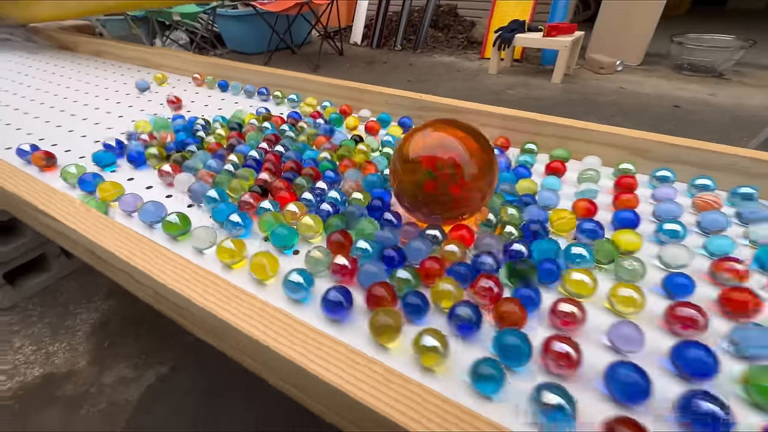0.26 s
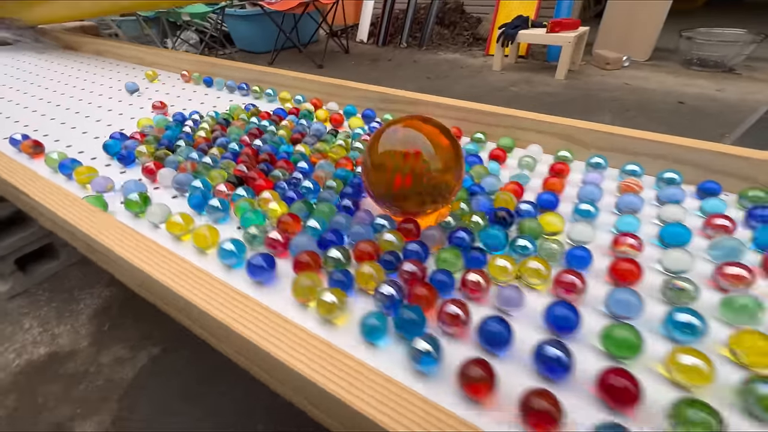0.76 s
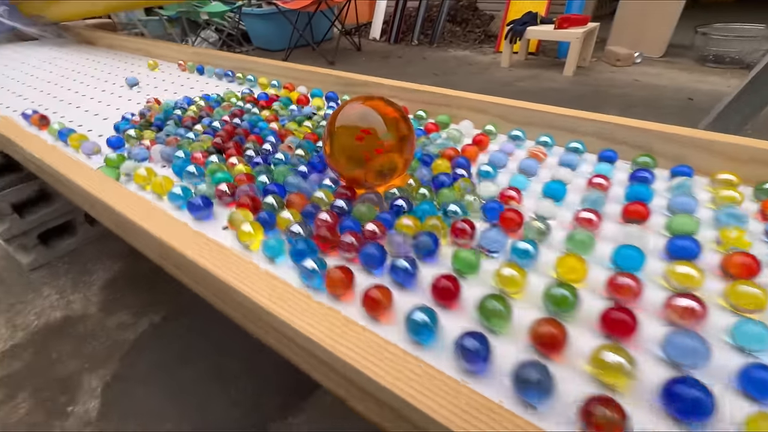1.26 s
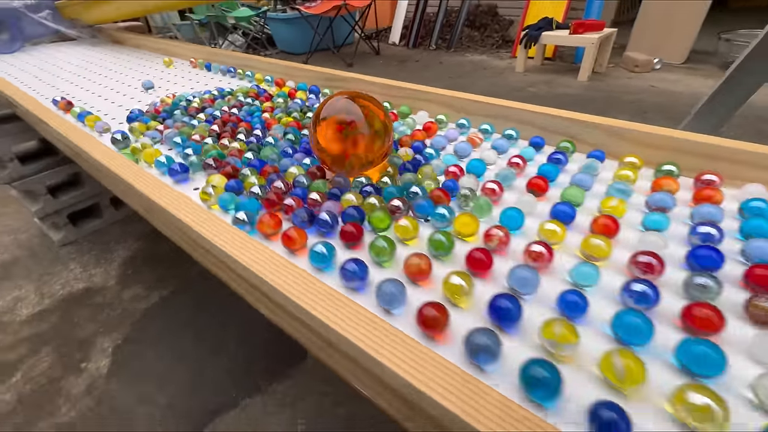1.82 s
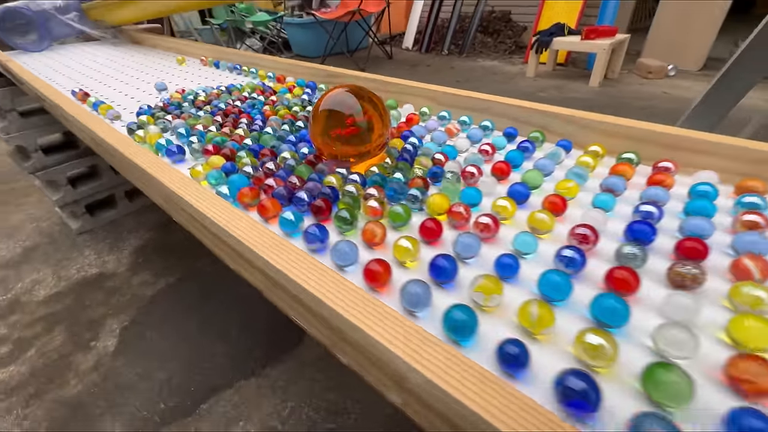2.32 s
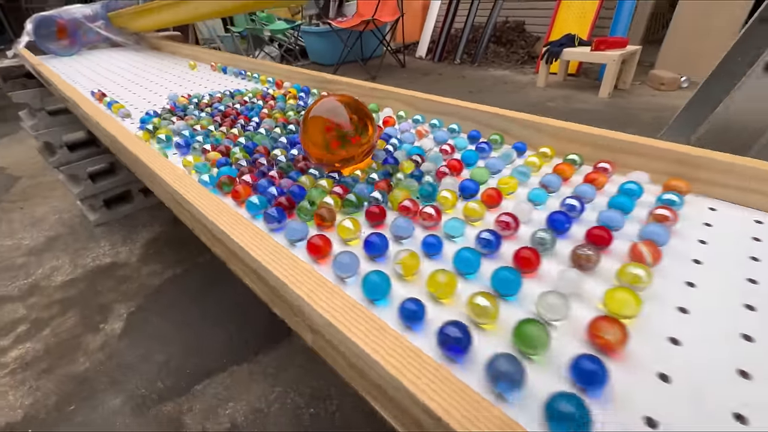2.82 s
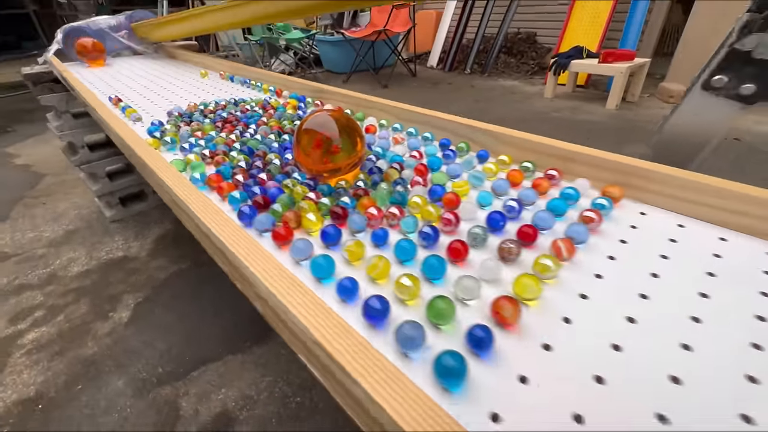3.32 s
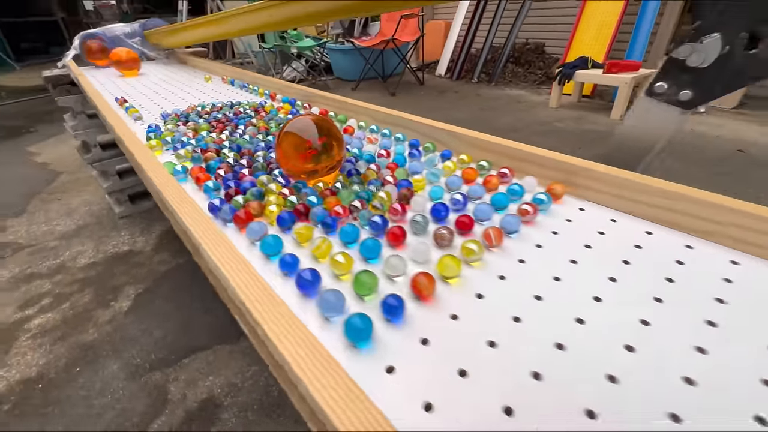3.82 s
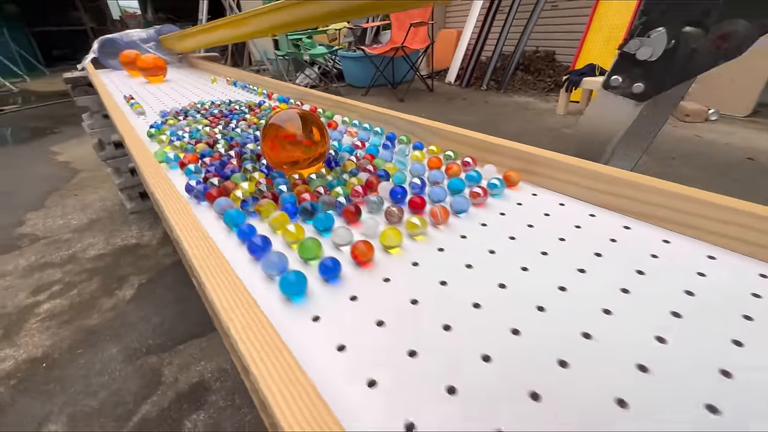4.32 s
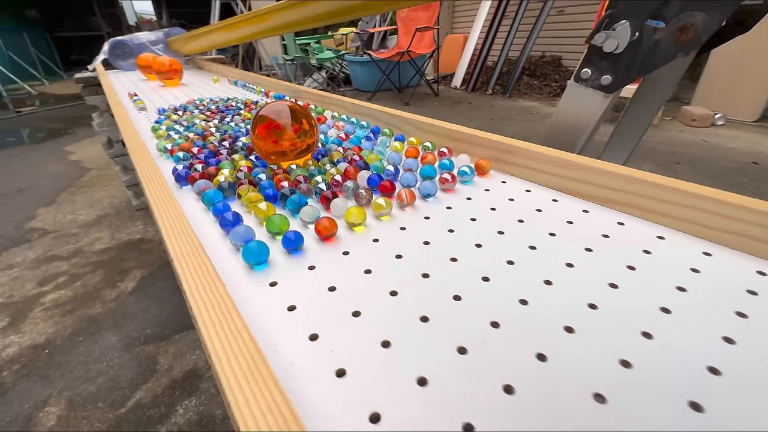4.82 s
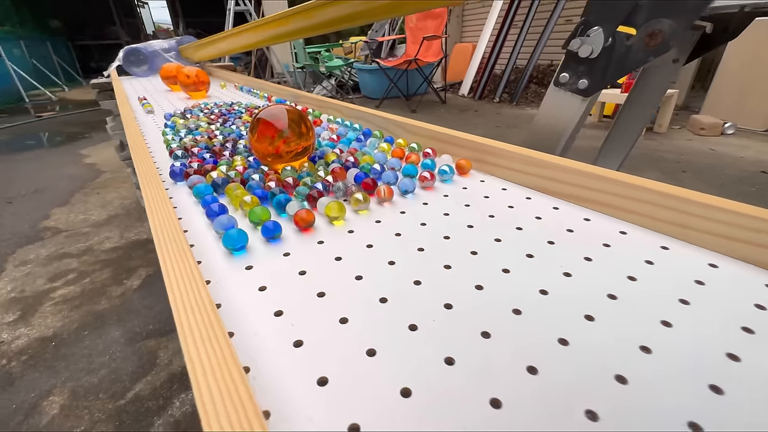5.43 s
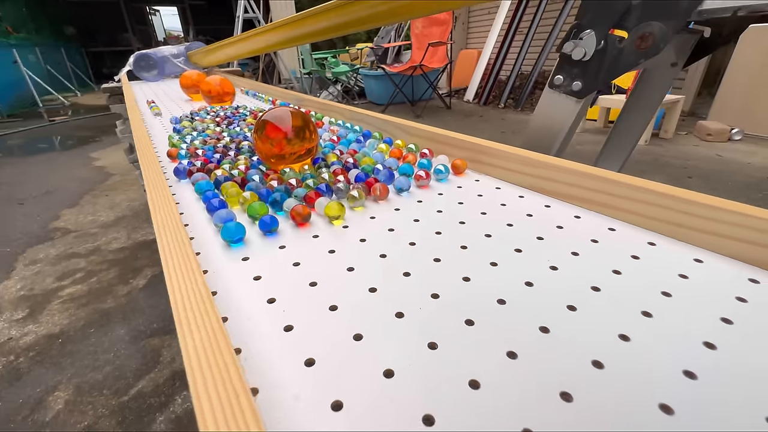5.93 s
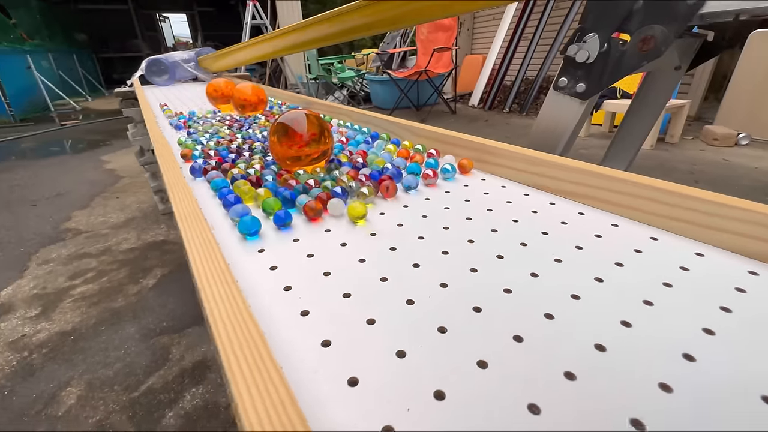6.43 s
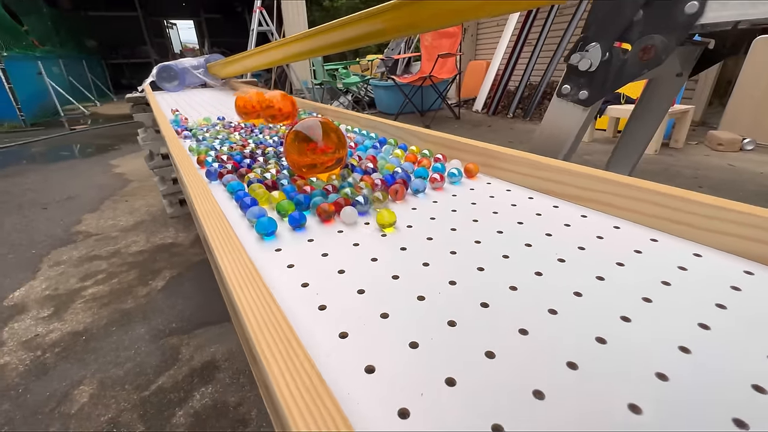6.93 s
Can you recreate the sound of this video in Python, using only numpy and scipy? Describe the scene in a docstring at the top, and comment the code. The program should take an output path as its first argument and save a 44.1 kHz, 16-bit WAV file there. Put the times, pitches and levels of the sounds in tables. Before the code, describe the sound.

Close stereo pickup of many small glass marbles jostling on a sloping wooden board in an open yard. Fine ticking and woody knocks run continuously; heavy marbles land with short solid thuds and rumbling rolls around the middle. The pack settles into quiet, separate clicks, then a loud, dense clatter of wood and glass bursts out and surges to the end. Dry, with slightly dulled treble and faint low rumble beneath.

```python
"""Hundreds of glass marbles jostle on a sloping wooden pegboard in a yard, heard close by in stereo.
They click on each other and knock on the board: short shaped noise bursts with brief rings.
Heavy marbles thump down as sagging notes with board modes, and roll in with a rumble of bumps.
The pack calms to single clicks, then a loud, dense clatter breaks out in surges and crashes.
Below lies filtered low noise; two unlike microphone ports pick everything up."""
import sys
import numpy as np
from scipy import signal
from scipy.fft import rfft, irfft, next_fast_len
from scipy.io import wavfile
from scipy.ndimage import uniform_filter1d

SR = 44100
rng = np.random.default_rng(int(sys.argv[2]) if len(sys.argv) > 2 else 0)


def master(y):
    """Save y as 16-bit WAV."""
    cut = np.clip(np.atleast_2d(y).T, -1, 1)
    pcm = np.round(cut * 32767)  # scale
    wavfile.write(sys.argv[1], SR, pcm.astype(np.int16))


N = 315756

# time and frequency axes of one contact sound
TAPS = 4096
T = np.arange(TAPS) / SR
HZ = np.fft.rfftfreq(TAPS, 1 / SR)

# colour of a heavy thud on the board: (frequency [Hz], relative density [dB per Hz])
THUD_COLOUR = [(40, -26), (110, -14.5), (220, -8), (390, -2), (480, -7), (800, -29), (2000, -63)]
# colour of a small knock on the board: (frequency [Hz], relative density [dB per Hz])
KNOCK_COLOUR = [(100, -30.5), (300, -14), (480, -5.5), (600, -0.5), (690, 1.5), (850, -3.5), (1100, -9),
                (1700, -27.5), (3500, -39)]
# colour of a light click of glass: (frequency [Hz], relative density [dB per Hz])
CLICK_COLOUR = [(500, -8), (1200, -11), (1800, -3), (2400, -2), (3350, 1.5), (4000, -7), (4600, -12),
                (5500, -16), (6500, -24), (7500, -42.5)]
# colour of a crisp snap of glass: (frequency [Hz], relative density [dB per Hz])
SNAP_COLOUR = [(500, -17.5), (1100, -5), (1700, -3), (2200, 2), (3400, 0), (4100, -3), (5000, -13.5),
               (6300, -20), (7500, -19)]
# a heavy marble comes down: (time [s], thud [dB], thud pitch [Hz], board ring [dB], glass click [dB]);
# the levels are relative
HEAVY_LANDINGS = [(0.4893, -20.5, 473, -25, -34.5), (0.715, -22.5, 310, -29, -34.5),
                  (1.038, -25, 665, -31, -35), (2.4311, -12, 390, -14, -25),
                  (2.486, -12.5, 407, -13, -15.5), (2.7456, -22.5, 720, -24, -28.5),
                  (2.847, -20.5, 278, -15, -17), (3.184, -10, 379, -17, -24.5),
                  (3.24, -11.5, 390, -15.5, -15), (3.502, -22, 613, -23, -26.5),
                  (3.5998, -19.5, 265, -18, -18)]

KNOCK_HZ, KNOCK_OCTAVES = 638, 0.15  # centre pitch of a knock, and its scatter
KNOCK_TONE = 0.2  # share of a knock's power that is one clear wooden note
THUMP_RISE_S = 0.0016  # time for the push to spread through the touching marbles


def pack():
    """Small marbles hop over the holes and tick against each other, now and then in a little cluster."""
    # the jostling pack, slowly calming: (time [s], knocks on the board [dB], relative glass level [dB])
    pack_levels = [(0, -30, -32.5), (0.33, -36.5, -35.5), (0.5, -31, -33.5), (0.9, -34.5, -33.5),
                   (1.28, -39.5, -37), (2.2, -35.5, -37), (2.8, -32.5, -35), (3.05, -35.5, -38),
                   (3.28, -23.5, -37), (3.85, -51, -39.5), (4.08, -31.5, -36.5), (4.25, -41, -38.5),
                   (4.68, -42.5, -36), (4.85, -50.5, -41.5), (5.6, -48, -41.5), (5.86, -56.5, -44),
                   (7.16, -34, -35.5)]
    calm_start_s, calm_s, calm_share = 3.9, 0.88, 0.95

    knocks = []
    for _ in range(60):
        contact = impact(read(KNOCK_COLOUR), ring_s=0.0037, tail_db=-15.0, tail_s=0.026, patchy_db=7.5, snap=0.81)
        ring = note(scattered(KNOCK_HZ, KNOCK_OCTAVES), rise_s=0.00055, ring_s=0.0039)
        knocks.append(blend(contact, ring, KNOCK_TONE))
    clicks = [tick() for _ in range(140)]
    chains = [impact(read(CLICK_COLOUR), ring_s=.006, tail_db=-24, tail_s=.02, patchy_db=4, snap=.5)
              for _ in range(40)]

    wood = level(pack_levels) * shower(knocks, spread_db=3.3, count=1400, size=4000)
    rattle = shower(clicks, spread_db=3.8, count=3000, size=5000)
    clusters = shower(chains, spread_db=3.0, count=230, size=12000)
    sparse = shower(clicks, spread_db=4.2, count=900, size=8000)
    # the fine rattle thins to separate ticks
    calm = np.clip((np.arange(N) / SR - calm_start_s) / calm_s, 0, calm_share)
    glass = amp(-2) * blend(rattle, sparse, calm) + amp(-4.5) * clusters
    return wood + level(pack_levels, axis=2) * glass


def tick():
    """Glass meets glass: a dry contact and a very short ring at its own pitch."""
    contact = impact(read(CLICK_COLOUR), ring_s=.0022, tail_db=-22, tail_s=.028, patchy_db=4, snap=.9)
    tick_hz, tick_octaves, tick_tone = 3078, .2, 0.26  # centre, scatter, the ring's share of the power
    return blend(contact, note(scattered(tick_hz, tick_octaves), rise_s=0.00017, ring_s=0.005), tick_tone)


def impacts():
    """The knocks, snaps, thumps, crashes and booms that stand out of the stream."""
    # a small marble drops onto the board: (time [s], relative level [dB])
    drops = [(0.0253, -11.5), (0.0583, -19.5), (0.1392, -21), (0.3659, -24.5), (0.414, -21), (0.5625, -18),
             (0.737, -16), (0.8262, -19.5), (0.8427, -20.5), (1.0256, -27), (1.2052, -23.5), (1.277, -16.5),
             (1.3526, -25), (1.4592, -21.5), (1.5064, -22.5), (1.579, -24.5), (1.6882, -15.5),
             (1.708, -15.5), (1.7856, -24), (2.081, -22.5), (2.1018, -20.5), (2.247, -21), (2.31, -25),
             (2.514, -20.5), (2.611, -18.5), (2.6486, -18), (2.724, -16), (2.771, -19.5), (3.4018, -18),
             (3.691, -25), (3.7202, -23.5), (3.8107, -20.5), (3.9444, -22), (4.3188, -25.5), (4.447, -23.5),
             (4.469, -30), (4.5655, -28), (4.6434, -29.5), (4.696, -32.5), (4.916, -34.5)]
    # two marbles snap together, glass on glass: (time [s], level [dB])
    glass_snaps = [(0.0258, -27), (0.145, -28.5), (0.167, -30.5), (0.732, -24), (0.903, -36),
                   (1.023, -27.5), (1.053, -29.5), (1.2446, -31), (1.569, -34), (1.697, -30.5),
                   (1.987, -32), (2.09, -33.5), (2.307, -38.5), (2.359, -34), (2.606, -27), (2.642, -24.5),
                   (2.886, -30.5), (3.028, -21), (3.64, -28), (3.719, -27), (3.772, -32.5), (3.81, -31),
                   (3.852, -32), (3.93, -31), (4.301, -30.5), (4.315, -29), (4.447, -40.5), (4.569, -30.5),
                   (4.856, -42.5), (4.8918, -34.5), (4.935, -35), (5.012, -37), (5.024, -35.5),
                   (5.0902, -38.5), (5.106, -39.5), (5.2727, -35.5), (5.331, -31), (5.4876, -36.5),
                   (5.571, -37.5), (5.758, -33.5), (5.8485, -37)]
    # a bunch of marbles crashes together in the final clatter:
    # (time [s], wood knock [dB], knock pitch [Hz], glass click [dB]); the levels are relative
    bunch_crashes = [(5.907, -18, 705, -21), (5.9171, -11, 525, -15), (5.927, -17.5, 709, -16.5),
                     (5.969, -19.5, 743, -15), (5.9962, -13, 1046, -17.5), (6.0614, -11.5, 621, -16.5),
                     (6.158, -13.5, 698, -18.5), (6.189, -13, 710, -18), (6.2131, -10.5, 795, -17.5),
                     (6.243, -15, 730, -17.5), (6.2592, -10.5, 1065, -28), (6.325, -17, 654, -17.5),
                     (6.337, -12, 647, -19), (6.457, -16.5, 820, -22.5), (6.48, -10.5, 868, -22.5),
                     (6.535, -15.5, 596, -21), (6.5982, -15.5, 730, -21.5), (6.6848, -18.5, 717, -45),
                     (6.7034, -14.5, 665, -17.5), (6.734, -31.5, 714, -21), (6.754, -19, 948, -22),
                     (6.7988, -12.5, 560, -20), (6.8982, -11, 777, -20), (6.909, -19, 700, -16.5),
                     (6.948, -15.5, 650, -20), (6.9831, -12.5, 712, -19.5), (7.0149, -10.5, 710, -35.5),
                     (7.043, -12.5, 727, -25), (7.058, -12, 1430, -18), (7.101, -13.5, 1290, -13),
                     (7.112, -13, 907, -18.5)]
    # the board booms as a heavy marble settles after its landing: (time [s], level [dB], length [s])
    settlings = [(2.494, -16, 0.058), (2.885, -26, 0.099), (3.248, -20.5, .1), (3.638, -22, 0.078),
                 (3.83, -31.5, 0.053)]

    out = np.zeros((2, N))
    for s, db in drops:
        pitch = scattered(KNOCK_HZ, KNOCK_OCTAVES)
        add(out, s, blow(db - 16, db, db - 13.5, pitch, KNOCK_TONE, rise_s=0.0014))
    for s, db in glass_snaps:
        add(out, s, snap_of(db))
    for s, *landing in HEAVY_LANDINGS:
        add(out, s, thump(*landing))
    for s, knock_db, knock_hz, click_db in bunch_crashes:
        add(out, s, crash(knock_db, knock_hz, click_db))
    for s, db, length_s in settlings:
        add(out, s, boom(db, length_s))
    return out


def blow(thud_db, knock_db, click_db, knock_hz, tone, rise_s, chain=1):
    """One impact thuds, knocks at its own pitch and clicks; harder clicks shift the colours of wood and glass."""
    # colour of a hard knock on the board: (frequency [Hz], relative density [dB per Hz])
    hard_knock = [(200, -40.5), (420, -7), (680, 0), (950, 1.5), (1270, -7), (1480, 1), (1900, -8.5),
                  (4000, -39)]
    # colour of a hard click of glass: (frequency [Hz], relative density [dB per Hz])
    hard_click = [(700, -36.5), (1300, -1), (1600, 5), (2400, 4), (3400, -2), (4100, -7), (5000, -13),
                  (6300, -16.5), (7500, -24.5)]

    hard = np.clip((click_db + 28.0) / 10, 0, 1)
    knock = (1 - hard) * read(KNOCK_COLOUR) + hard * read(hard_knock)
    click = (1 - hard) * read(CLICK_COLOUR) + hard * read(hard_click)
    thud = impact(read(THUD_COLOUR), ring_s=.009, tail_db=-19, tail_s=.045, patchy_db=3, snap=.3, rise_s=rise_s)
    wood = impact(knock, ring_s=.007 * chain, tail_db=-15, tail_s=.05, patchy_db=3, snap=.6, rise_s=rise_s)
    wood = blend(wood, note(knock_hz, rise_s, ring_s=0.0057 * chain), tone)
    glass = impact(click, ring_s=.005 * chain, tail_db=-20, tail_s=.035, patchy_db=2, snap=.4, rise_s=rise_s)
    return amp(thud_db - 1.5) * thud + amp(knock_db - 3) * wood + amp(click_db - 1.5) * glass


def snap_of(db):
    """One crisp, broad click of glass, with a little knock from the board."""
    glass = impact(read(SNAP_COLOUR), ring_s=.003, tail_db=-24, tail_s=.025, patchy_db=1.5, snap=1.1, rise_s=.0006)
    wood = impact(read(KNOCK_COLOUR), ring_s=.006, tail_db=-15, tail_s=.04, patchy_db=3, snap=.6)
    return amp(db) * (glass + amp(-25.5) * wood)


def thump(thud_db, thud_hz, ring_db, click_db):
    """A heavy marble bends the board in one solid, sagging thud, rings its modes, cracks and rebounds once."""
    thud = note(thud_hz, rise_s=0.0022, ring_s=0.0077, sag=0.24)
    # loose marbles jolted by the thud
    blur = impact(read(THUD_COLOUR), ring_s=.009, tail_db=-19, tail_s=.045, patchy_db=2, snap=.3,
                  rise_s=THUMP_RISE_S)
    sound = amp(thud_db - 1.5) * (thud + amp(-12) * blur) + amp(ring_db - 4.5) * board()
    crack_db = ring_db - 3.5
    sound += crack(crack_db, click_db)
    # the marble strikes once more, weaker
    rebound_s, rebound_db = 0.0062, -8
    add(sound, rebound_s, amp(rebound_db) * crack(crack_db, click_db))
    return sound


def board():
    """The modes of the pegboard, struck with random phases; rms 1 over the first 10 ms."""
    # modes of the pegboard: (frequency [Hz], relative level [dB], time to fall 60 dB [s])
    modes = [(173.4, -8, .15), (235, -0.5, 0.11), (377, -3.5, 0.06), (508, -2.5, 0.078), (669, -9, 0.13),
             (1133, -2.5, 0.06), (1227, -5.5, 0.071), (1490, -6, 0.051)]
    sound = 0
    for hz, db, t60 in modes:
        sound = sound + amp(db - 60 * T / t60) * np.sin(2 * np.pi * (hz * T + rng.random((2, 1))))
    sound = sound * (1 - np.exp(-T / THUMP_RISE_S)) * (1 - (T / T[-1]) ** 2)
    return onset_evened(sound)


def crack(wood_db, click_db):
    """The contact of a heavy marble: a short, dry crack of the board and a snap of glass, brighter when harder."""
    # colour of the dry crack of the board: (frequency [Hz], relative density [dB per Hz])
    crack_colour = [(400, -9), (900, -5.5), (1400, -1), (2100, -2.5), (3200, -20.5)]
    hard = np.clip((click_db + 16.0) / 7.0, 0, 1)
    # up to 14 dB of extra treble above 2.5 kHz
    colour = read(SNAP_COLOUR) + hard * 14 * np.clip(HZ / 2500 - 1, 0, 1)
    glass = impact(colour, ring_s=.004, tail_db=-26, tail_s=.03, patchy_db=1, snap=.35, rise_s=.0022)
    wood = impact(read(crack_colour), ring_s=.0055, tail_db=-20, tail_s=.025, patchy_db=2, snap=.4, rise_s=.002)
    return amp(wood_db) * wood + amp(click_db) * glass


def crash(knock_db, knock_hz, click_db):
    """A glassy crash runs on through the bunch; the more wood outweighs glass, the shorter and clearer its note."""
    wooden = np.clip((knock_db - click_db - 11.5) / 17.0, 0, 1)
    # share of clear note, and ring length relative to a single blow: from glassy to wooden
    tone = 0.3 + wooden * (0.62 - 0.3)
    chain = 1.5 + wooden * (0.49 - 1.5)
    return blow(knock_db - 13.5, knock_db, click_db, knock_hz, tone, rise_s=0.0015, chain=chain)


BOOM_HZ = 167.4  # settled pitch of the board's lowest bending mode


def boom(db, length_s):
    """The board's lowest bending mode swells, sinks in pitch and dies, jostled unevenly by the marbles on it."""
    sag_hz, sag_s, rise_s = 23.6, 0.027, 0.026  # how much higher it starts, time to sink, swell
    roughness = .42  # unevenness relative to the steady tone
    t = np.arange(SR // 2) / SR
    pitch = BOOM_HZ + sag_hz * np.exp(-t / sag_s)
    knots = np.arange(0, 1, .02)
    jostle = np.array([np.interp(t, knots, a + 1j * b) for a, b in rng.standard_normal((2, 2, len(knots)))])
    turning = np.exp(2j * np.pi * (np.cumsum(pitch) / SR + rng.random()))
    # the two channels start a quarter turn apart
    tone = ((np.array([[1], [1j]]) + roughness * jostle) * turning).real
    return amp(db) * (1 - np.exp(-t / rise_s)) * np.exp(-(t / length_s) ** 2) * tone


def rolling():
    """Heavy marbles bump from hole to hole and whir; their thumps shake the board and keep it humming faintly."""
    # heavy marbles rolling over the holes: (time [s], relative level [dB])
    roll_levels = [(0, -48), (2.3, -39), (2.75, -28.5), (3.05, -34), (3.9, -40.5), (4.1, -31.5),
                   (4.3, -58.5), (5.8, -56)]
    # one large marble whirs as it gathers speed: (time [s], pitch [Hz], level [dB])
    whir_curve = [(3.88, 386, -63), (3.95, 373, -32.5), (4.02, 393, -48), (4.065, 397, -31.5),
                  (4.095, 502, -41), (4.15, 530, -38), (4.205, 547, -54), (4.25, 600, -44),
                  (4.29, 600, -70)]

    bumps = []
    for _ in range(40):
        contact = impact(read(THUD_COLOUR), ring_s=0.0044, tail_db=-20.0, tail_s=0.11, patchy_db=-1.0, snap=0.8)
        bumps.append(contact + amp(-8.0) * board())
    rough = shower(bumps, spread_db=4, count=1800, size=3000)
    # after each thump the marbles bump about on the shaken board
    shake = amp(-10.5) * wake(HEAVY_LANDINGS, rise_s=0.0085, fall_s=0.072)
    # the low bending mode lingers, stronger after a harder click
    lingering = wake(HEAVY_LANDINGS, rise_s=0.046, fall_s=0.22, axis=4)
    hum = amp(-17) * lingering * steadied(resonate_twice(rough, BOOM_HZ, width_hz=30), size=4000)
    s, whir_hz, _ = np.transpose(whir_curve)
    pitch = np.interp(np.arange(N) / SR, s, whir_hz)
    whir = level(whir_curve, axis=2) * steadied(resonate_twice(rough, pitch, width_hz=20), size=2000)
    return amp(0.5) * np.hypot(level(roll_levels), shake) * rough + hum + whir


def clatter():
    """Crowded collisions ring wood and glass together: briefly after hard landings, then a bed with surges."""
    # colour of the crowded blows: (frequency [Hz], relative density [dB per Hz])
    clatter_colour = [(60, -20.5), (130, -7.5), (250, -6), (390, -7), (500, -8), (660, 0.5), (1050, 0.5),
                      (1280, -5), (1480, -3), (2400, -6.5), (3400, -8), (3900, -13.5), (4400, -19),
                      (5200, -20.5), (7400, -34.5)]
    # board resonances that the clatter keeps ringing: (frequency [Hz], width [Hz], relative level [dB])
    body_modes = [(391, 111, -3.5), (636, 200, -6)]
    # a wave of marbles tumbles in: (time [s], level [dB])
    waves = [(5.872, -40.5), (5.889, -25.5), (5.905, -15), (6.18, -19), (6.32, -19.5), (6.9, -15),
             (6.98, -18), (7.1, -17.5)]
    start_s, attack_s, bed_db = 5.85, 0.19, -26.5
    clonk_hz, clonk_octaves, clonk_db = 799, .6, -5.5  # single wooden notes: centre, scatter, relative level

    blows = [impact(read(clatter_colour), ring_s=0.004, tail_db=-9.5, tail_s=0.029, patchy_db=4.0, snap=0.95)
             for _ in range(70)]
    notes = [note(scattered(clonk_hz, clonk_octaves), rise_s=0.00052, ring_s=0.0081) for _ in range(120)]
    stream = shower(blows, spread_db=3.2, count=2500, size=1600)
    clonks = amp(clonk_db) * shower(notes, spread_db=2.4, count=1200, size=3500)
    body = sum(amp(db) * steadied(resonate_twice(stream, hz, width_hz), size=1500)
               for hz, width_hz, db in body_modes)

    bed = amp(bed_db) * np.clip((np.arange(N) / SR - start_s) / attack_s, 0, 1) ** 2
    # each thump knocks loose a brief tumble, stronger after a harder click
    tumbles = amp(-10.5) * wake(HEAVY_LANDINGS, rise_s=0.0033, fall_s=0.13, axis=4)
    surges = wake(waves, rise_s=0.0069, fall_s=0.12)
    crowd = np.sqrt(bed ** 2 + tumbles ** 2 + surges ** 2) * (stream + clonks)
    # the resonances follow the surges more weakly
    return crowd + np.hypot(bed, amp(-5) * surges) * body


def rumble():
    """Low noise of the shaking frame."""
    # deep rumble under the board: (time [s], relative level [dB])
    rumble_levels = [(0.0, -48), (0.48, -41.5), (1.56, -49), (3.57, -34), (5.2, -48.5), (6.22, -43.5),
                     (7.16, -60.5)]
    # its colour: (frequency [Hz], relative density [dB per Hz])
    rumble_colour = [(10, -9.5), (28, 1), (45, 1), (65, -5.5), (110, -2.5), (220, -25), (600, -35.5),
                     (3000, -67.5)]
    spectrum = rfft(rng.standard_normal((2, N))) * amp(read(rumble_colour, np.fft.rfftfreq(N, 1 / SR)))
    return amp(-2.0) * level(rumble_levels) * evened(irfft(spectrum, N))


def impact(colour_db, ring_s, tail_db, tail_s, patchy_db, snap, rise_s=0.0041):
    """One contact, its quick rebounds among the neighbours and a faint tail; rms 1 over its first 10 ms."""
    # the push spreads through the touching marbles within milliseconds, then dies quickly
    spread = (1 - np.exp(-T / rise_s)) * np.exp(-(T / ring_s) ** 1.3)
    rebounds = rng.standard_normal((2, TAPS)) * spread
    tail = amp(tail_db) * rng.standard_normal((2, TAPS)) * np.exp(-T / tail_s) * (1 - T / T[-1])
    force = (rebounds + tail) / np.linalg.norm(rebounds[0])
    # a single-sample snap 1 ms in
    force[:, SR // 1000] += snap * rng.choice([-1, 1], 2)
    # every marble and every spot on the board favours its own pitches
    knots = np.linspace(np.log(50), np.log(9000), 48)
    patches = np.interp(np.log(HZ + 1), knots, rng.standard_normal(48))
    return onset_evened(irfft(rfft(force) * causal(colour_db + patchy_db * patches)))


def note(hz, rise_s, ring_s, sag=0):
    """One short, solid ring whose pitch may sag as it dies; rms 1 over its first 10 ms."""
    pitch = hz * (1 + sag * (np.exp(-T / ring_s) - .5))
    phase = 2 * np.pi * (np.cumsum(pitch) / SR + rng.random())
    tone = np.array([np.sin(phase), rng.choice([-1, 1]) * np.cos(phase)])
    return onset_evened(tone * (1 - np.exp(-T / rise_s)) * np.exp(-(T / ring_s) ** 1.3))


def shower(kinds, spread_db, count, size):
    """A stream of contacts of random strength, loosely one in each slot of time, with its level held near 1."""
    out = np.zeros((2, N))
    for k, (late, chance, kind) in enumerate(rng.random((count, 3))):
        s = max(k + 10 * (late - .5), 0) / count * N / SR
        strength = amp(-spread_db * np.log(chance + 0.16))
        add(out, s, kinds[int(kind * len(kinds))] * strength)
    return steadied(out, size)


def wake(events, rise_s, fall_s, axis=1):
    """The motion that events leave behind, by one dB column: each swells and dies, and their powers add."""
    power = np.zeros(N)
    t = np.arange(SR) / SR
    shape = (1 - np.exp(-t / rise_s)) * np.exp(-t / fall_s)
    for row in events:
        part = power[round(row[0] * SR):][:SR]
        part += (amp(row[axis]) * shape[:len(part)]) ** 2
    return np.sqrt(power)


def resonate(x, hz, width_hz):
    """A resonance of gain 1 that can follow a pitch curve."""
    turn = np.exp(2j * np.pi * np.cumsum(hz * np.ones(N)) / SR)
    r = np.exp(-np.pi * width_hz / SR)
    # shift the pitch down to zero, smooth there, shift back
    return 2 * (turn * signal.lfilter([1 - r], [1, -r], x / turn)).real


def resonate_twice(x, hz, width_hz):
    """Two equal resonances in a row, for steeper skirts."""
    return resonate(resonate(x, hz, width_hz), hz, width_hz)


def causal(db):
    """The minimum-phase response with this gain, which rings only after its cause."""
    log_gain = np.log(amp(np.r_[db, db[-2:0:-1]]))
    return np.exp(np.conj(signal.hilbert(log_gain)))[:len(db)]


def scattered(hz, octaves):
    """A random pitch around hz."""
    return hz * 2 ** (octaves * np.clip(rng.standard_normal(), -2, 2))


def blend(a, b, share):
    """Gives b this share of the power."""
    share = np.clip(share, 0, 1)
    return np.sqrt(1 - share) * a + np.sqrt(share) * b


def steadied(x, size):
    """Holds the level near 1 over stretches of this many samples."""
    return x / np.sqrt(abs(uniform_filter1d((x ** 2).mean(0), size=size)) + 1e-9)


def evened(x):
    """Scales to rms 1."""
    return x / np.sqrt(np.mean(x ** 2) + 1e-20)


def onset_evened(sound):
    """Scales to rms 1 over the first 10 ms."""
    return sound / np.sqrt(np.mean(sound[:, :SR // 100] ** 2))


def amp(db):
    """Decibels to gain."""
    return 10 ** (np.asarray(db) / 20)


def read(points, hz=HZ):
    """A spectrum table on a log-frequency axis, in dB."""
    f, db = np.transpose(points)
    return np.interp(np.log(hz + 1), np.log(f), db)


def level(rows, axis=1):
    """One dB column of a curve as a gain for every sample."""
    rows = np.array(rows)
    return amp(np.interp(np.arange(N) / SR, rows[:, 0], rows[:, axis]))


def add(mix, s, sound):
    """Mixes a sound in at time s."""
    part = mix[:, max(round(s * SR), 0):][:, :sound.shape[1]]
    part += sound[:, :part.shape[1]]


def scene():
    """Two unlike views of the same contacts, with their reflections from the rails, over the rumble."""
    # the narrow side rails reflect only the treble: (delay [s], level [dB])
    rail_echoes = [(.00175, -45), (.0048, -26)]
    direct = impacts() + pack() + rolling() + clatter()
    treble = signal.sosfilt(signal.butter(2, 1000, "high", fs=SR, output="sos"), direct)
    echoes = sum(amp(db) * np.pad(treble, ((0, 0), (round(s * SR), 0)))[:, :N] for s, db in rail_echoes)
    return direct + echoes + rumble()


def record(dry):
    """Two ports share the sound with pitch-dependent likeness, phase and balance; peaks round; treble is cut."""
    # the two microphone ports:
    # (frequency [Hz], left minus right [dB], likeness [0-1], phase lead of the left [rad])
    port_curves = [(50, -3.5, .5, 0), (400, -2, .66, 1.2), (780, -9, .5, 2.3), (1100, -3, .35, 3.6),
                   (1500, -5.5, .35, 6.4), (1800, -4.9, .43, 7.2), (2330, -1.5, .72, 12.5),
                   (2600, -3, .6, 14.4), (2900, -6.2, .6, 19.2), (3250, -9, .45, 24.9),
                   (3500, -6.7, .25, 26), (3750, -3.5, .5, 24.2), (4050, 0, .92, 23.3),
                   (4450, 0, .995, 22.05), (5800, 0, .99, 18.85), (7100, 0, .995, 15.6)]
    size = next_fast_len(N + TAPS)
    hz = np.fft.rfftfreq(size, 1 / SR)
    f, *columns = np.transpose(port_curves)
    balance_db, same, lead = (np.interp(hz, f, c) for c in columns)
    right, other = rfft(dry, size)
    left = (same * right + np.sqrt(1 - same ** 2) * other) * np.exp(1j * lead) * amp(balance_db)
    # the balance leaves the summed power of both ports unchanged
    shared_gain = np.sqrt(2 / (1 + amp(balance_db) ** 2))
    pair = irfft(np.array([left, right]) * shared_gain, size)[:, :N]
    rounded = pair / (1 + (pair / .9) ** 6) ** (1 / 6)
    edge_hz = 7680
    low_pass = signal.firwin(201, edge_hz, window=("kaiser", 8), fs=SR)
    return signal.oaconvolve(rounded, low_pass[None], "same")


dry = scene()
out = record(dry)
master(out)
```